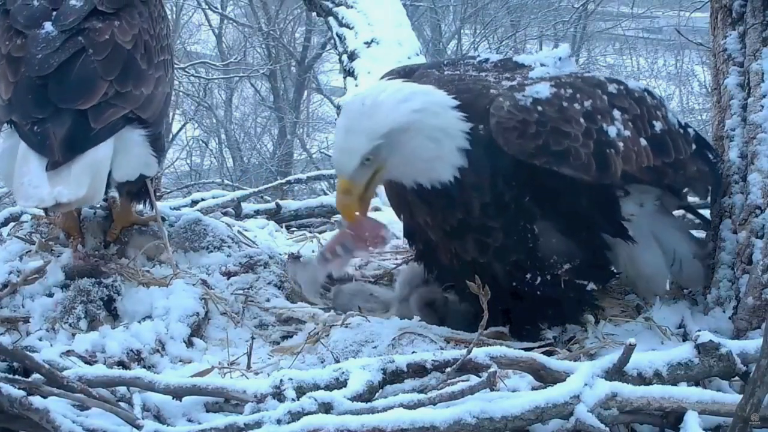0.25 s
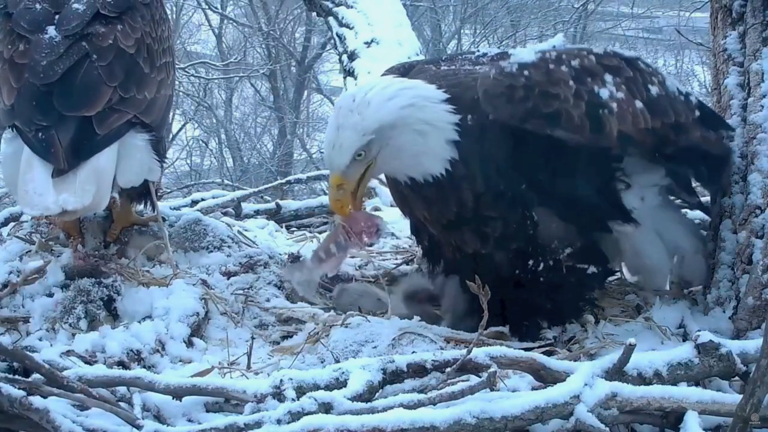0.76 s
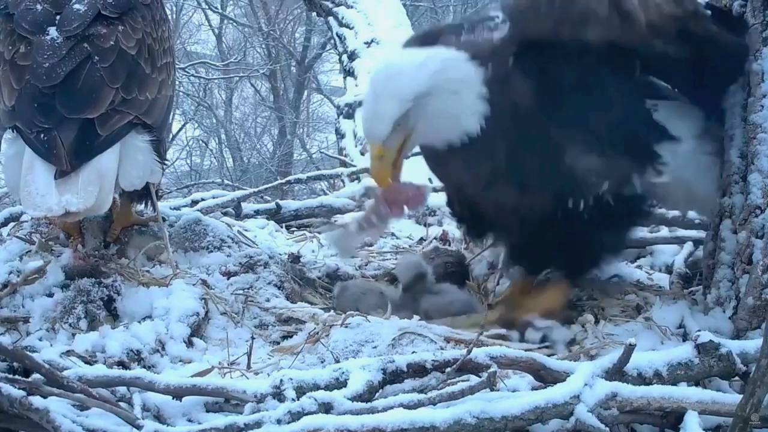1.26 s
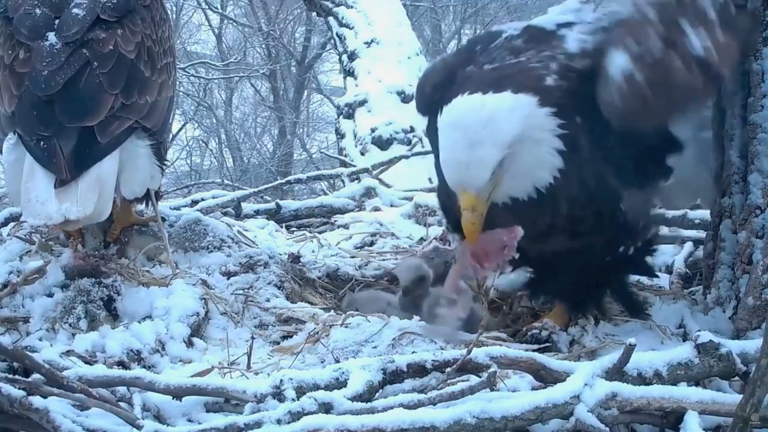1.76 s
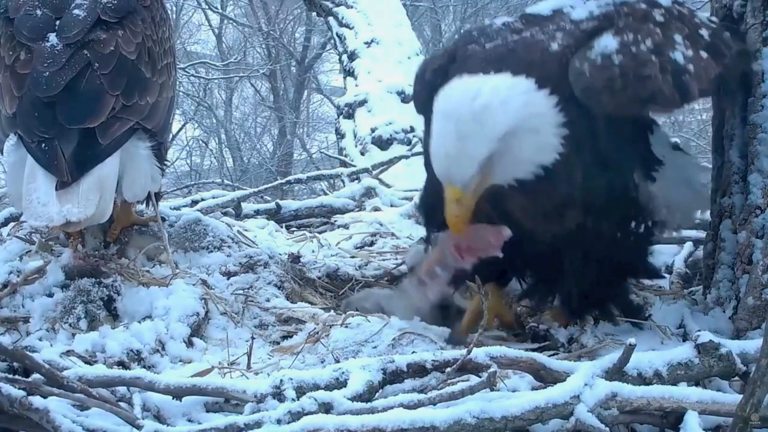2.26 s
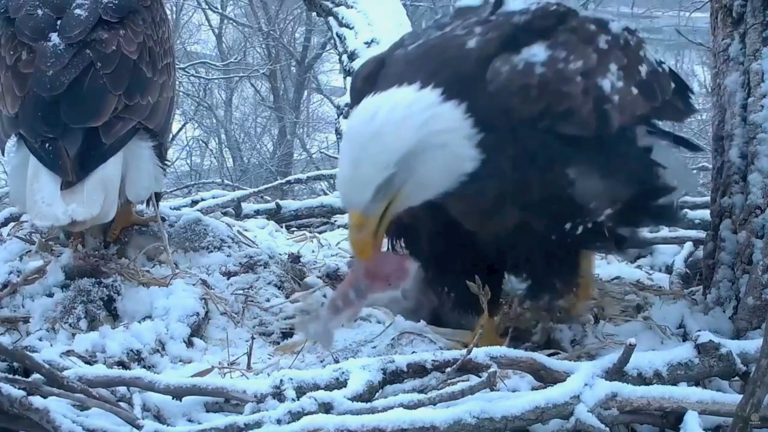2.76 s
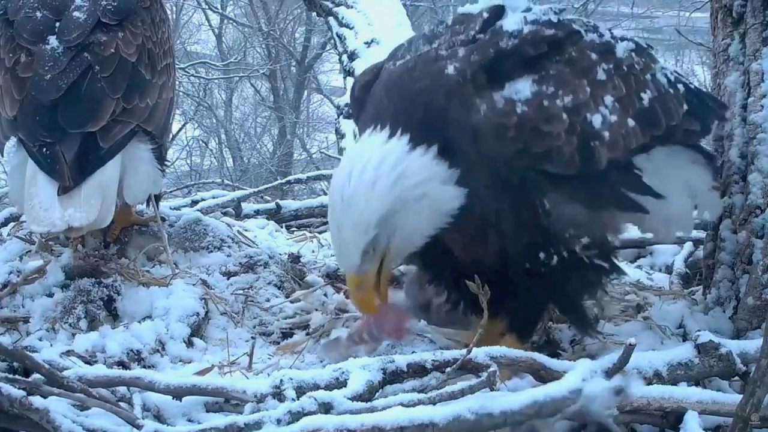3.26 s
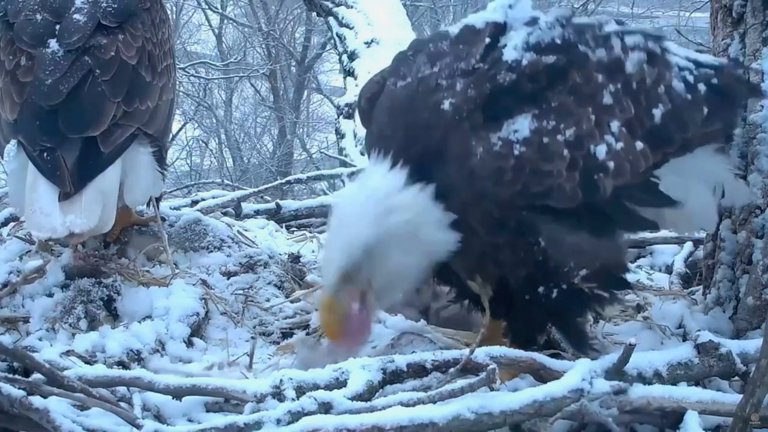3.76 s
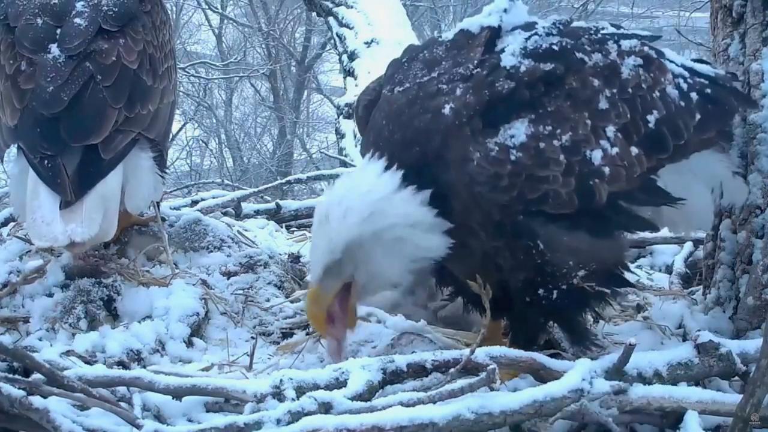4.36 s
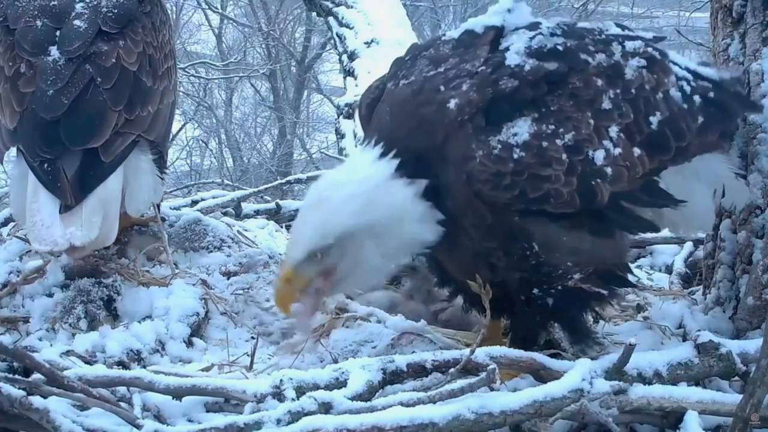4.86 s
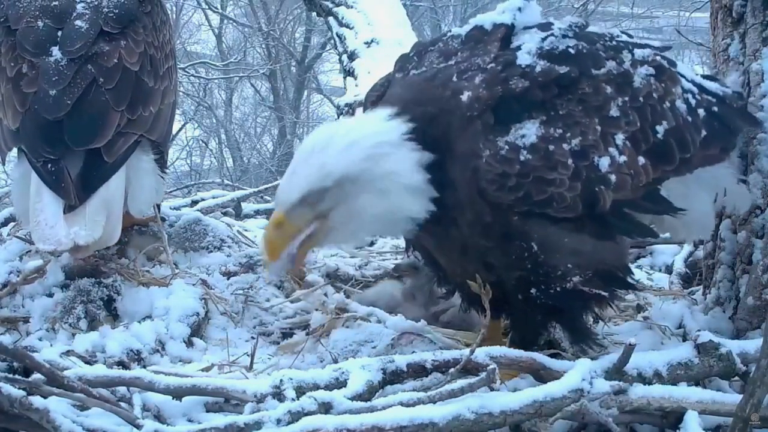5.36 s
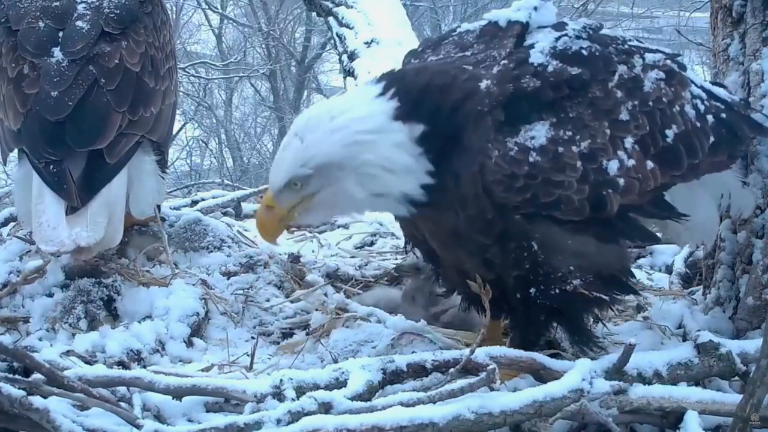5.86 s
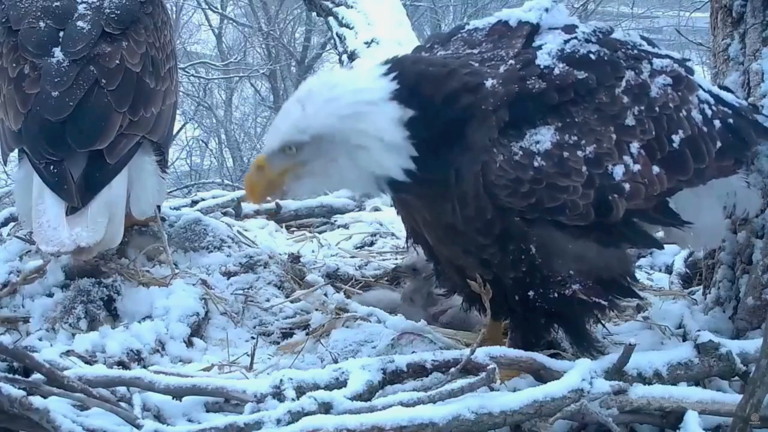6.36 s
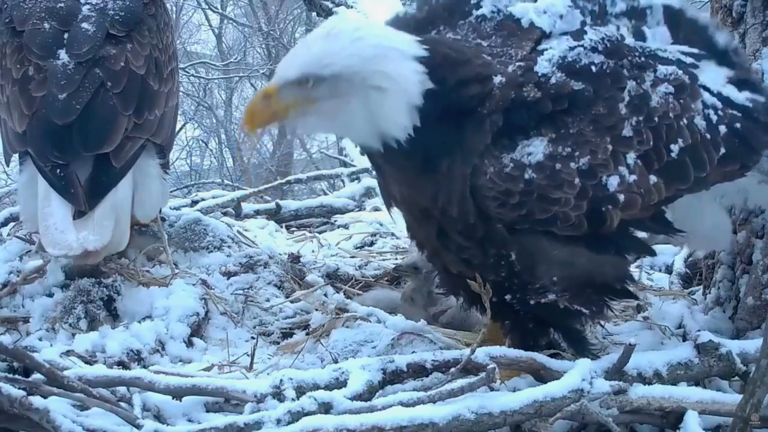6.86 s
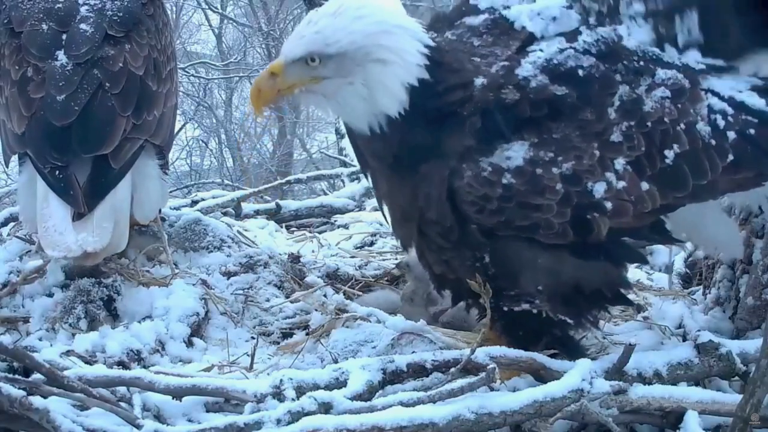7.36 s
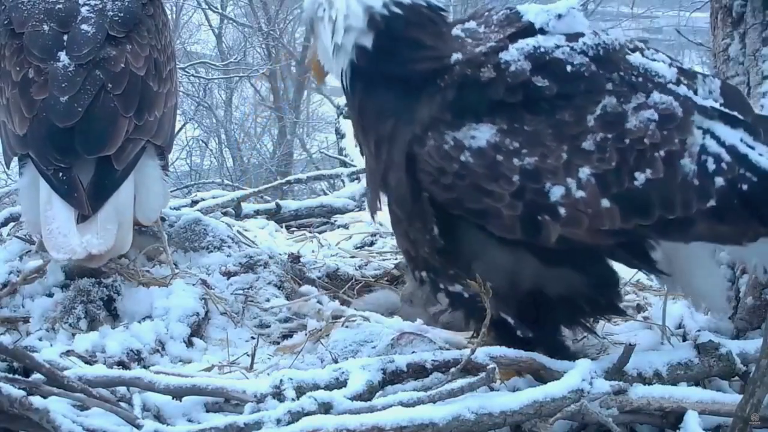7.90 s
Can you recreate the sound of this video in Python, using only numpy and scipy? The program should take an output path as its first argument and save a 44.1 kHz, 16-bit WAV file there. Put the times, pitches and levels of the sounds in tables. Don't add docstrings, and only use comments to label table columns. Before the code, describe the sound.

A close, low-quality outdoor microphone picks up hungry eaglets: tiny peeps, about seven piercing chirps in rapid succession, stuttering little notes between them, then irregular cheeps with growing gaps. Dry nest material rustles softly during the feeding. Later calls are quieter and sparser, ending with a small cluster of cheeps. A low windy hum with hiss stays underneath, and the calls have a bright, brittle digital edge and a brief woodland echo.

```python
import sys
import numpy as np
from scipy import signal
from scipy.fft import rfft, irfft, next_fast_len
from scipy.io import wavfile
from scipy.ndimage import uniform_filter1d

SR = 44100
rng = np.random.default_rng(int(sys.argv[2]) if len(sys.argv) > 2 else 0)


def master(y):
    cut = np.clip(np.atleast_2d(y).T, -1, 1)
    pcm = np.round(cut * 32767)
    wavfile.write(sys.argv[1], SR, pcm.astype(np.int16))


def field_ratio(decibels):
    return 10 ** (np.asarray(decibels, dtype=float) / 20)


N = 358533

# (time of peak [s], level [dB rms], pitch [Hz], rise [ms], fall [ms])
CHIRPS = [
    (0.7279, -27, 3140, 4.2, 2.9),
    (0.8203, -22.5, 3135, 4.5, 1.6),
    (0.9214, -22.5, 3085, 5.2, 1),
    (1.0276, -24.5, 3316, 4.8, 2.7),
    (1.1202, -23, 3535, 1.6, 2.97),
    (1.2228, -30, 3533, 4.5, 5),
    (1.3079, -40, 3476, 3.8, 3.1),
    (2.4154, -27, 3310, 3.9, 0.57),
    (7.811, -46, 3520, 1.9, 2.0),
    (7.955, -47.5, 3500, 2.3, 1.8),
]
CHIRP_TOP_HZ, SLIDE_SHARE = 3990, 0.556

# (time of peak [s], level [dB rms], pitch [Hz], glide [Hz/ms], length [ms])
CHEEPS = [(0.6463, -49, 3124, -13, 24), (2.615, -53, 2895, 17, 18), (2.757, -55, 3080, 29, 10),
          (1.2251, -33, 3346, -38, 3.7), (1.7596, -26, 2990, 18, 1.85), (1.9627, -33, 2930, -12, 3.1),
          (1.9852, -40, 3200, -16, 4.3), (2.02, -36.5, 3000, 13, 2.16), (2.2428, -26, 3130, -71, 1.57),
          (4.0299, -52.5, 3500, 13, 6.1), (4.5199, -34, 3140, 19, 2.13), (4.7286, -24, 3207, -66, 3.2),
          (4.729, -35.5, 3680, -32, 3.7), (4.734, -39, 2420, -3, 5.8), (4.752, -40, 3150, 5, 3.9),
          (6.1626, -36, 3040, -35, 3.1), (6.171, -41.5, 3015, -12, 4.6), (6.5013, -38, 3125, -3.5, 7),
          (7.5008, -37, 3150, 9, 4.6), (7.6671, -34, 3190, 38, 4.7), (7.814, -32.5, 3150, -28, 4.5),
          (7.815, -37.5, 2974, -17, 4), (7.958, -35.5, 3150, -4, 5.5), (7.9715, -40.5, 2865, -96, 3.8)]
CHEEP_RISE_SHARE = 0.47

BLIP_DELAY_MS, BLIP_DB, BLIP_HZ, BLIP_RISE_MS, BLIP_FALL_MS = 19, -25.5, 3200, 2.9, 4.3

# (time of peak [s], level [dB rms], pitch [Hz], length [ms])
STUTTERS = [(0.7891, -40, 3200, 7.1), (0.7984, -41.5, 3320, 11), (0.8044, -44, 3210, 7),
            (0.897, -38.5, 3590, 9), (0.9098, -37, 3230, 3.7), (0.9725, -46.5, 3150, 11),
            (1.002, -39.5, 3230, 5.1), (1.0098, -35.5, 3280, 6.7), (1.0964, -45.5, 3350, 15),
            (1.1995, -42, 3380, 4), (1.204, -36.5, 3240, 7), (1.213, -33.5, 3620, 8), (1.234, -50, 3430, 4),
            (1.888, -40.5, 3206, 8), (1.9, -52, 3160, 15.1), (1.982, -44.5, 3765, 7.5),
            (2.001, -53, 3400, 9.4), (2.042, -47, 3130, 19.7), (2.067, -43, 3050, 7.7),
            (2.095, -63, 3700, 8.7), (2.2639, -46, 3050, 7.6), (1.979, -53, 3850, 6),
            (0.945, -47, 3750, 19), (0.86, -52, 3700, 16), (1.06, -57, 3700, 16), (2.377, -50.5, 3090, 24),
            (2.4458, -51, 3560, 7.3)]
# (time of peak [s], level [dB
# rms], pitch [Hz], length [ms])
SOFT_PEEPS = [(0.023, -64, 2970, 14), (0.0334, -51.5, 3010, 4.2), (0.065, -63, 2870, 15),
              (0.0941, -54, 3000, 7.4), (0.1885, -52.5, 2980, 5.9), (0.2835, -51.5, 3040, 13),
              (0.3, -58, 3020, 8.3), (0.385, -56.5, 3070, 20), (0.494, -57, 2920, 2.8),
              (0.514, -53, 3500, 6.8), (0.5216, -48.5, 3500, 6.4), (0.604, -54, 2990, 7.3),
              (0.632, -51, 3200, 8), (3.02, -66, 3420, 14), (3.125, -61, 3550, 21),
              (2.8258, -60, 3103, 13.5), (2.8908, -56, 2890, 4.8), (3.3653, -62, 3190, 13),
              (3.385, -64, 3500, 16), (3.7596, -59, 2830, 10), (3.9184, -57.5, 2880, 2.8),
              (4.104, -65, 3290, 53), (4.516, -52, 3640, 4.3), (4.1348, -54.5, 3030, 4.3),
              (4.2741, -60, 3120, 5.3), (4.3362, -64.5, 3115, 18), (4.5568, -54, 3810, 6.3),
              (5.46, -46.5, 3020, 8.5), (5.477, -50, 3100, 8), (6.154, -44, 3064, 4.7),
           (6.18, -44.5, 3060, 7.8), (6.506, -52, 2842, 11), (6.52, -54, 3180, 8.7),
           (6.536, -58.5, 3780, 6.7), (6.87, -75, 3680, 36), (6.934, -62, 2940, 6.4),
           (7.051, -55, 3153, 25.5), (7.1235, -64.5, 3130, 8.6), (7.47, -62, 3200, 4.6),
           (7.598, -61, 3140, 7.9), (7.7184, -53, 3094, 14.4), (7.7584, -52, 3200, 5.7),
           (7.83, -49, 3450, 8.2), (7.998, -54, 3070, 7.6), (8.0625, -57, 3184, 9)]
# (time of peak [s], level [dB rms], pitch [Hz], length [ms])
SQUEAKS = [
    (0.747, -48.5, 1820, 24),
    (1.893, -45.5, 1874, 11.4),
    (1.92, -51, 1833, 20),
    (2.082, -51, 2495, 13),
    (2.125, -52.5, 2764, 12.4),
    (2.392, -62, 2450, 20),
    (2.776, -58, 2235, 27),
    (4.731, -43.5, 2132, 7),
    (5.2145, -56, 2485, 33),
    (7.842, -67, 2310, 33),
]
# (time of peak [s], level [dB rms], pitch [Hz], length [ms])
WHISTLES = [
    (2.041, -65, 4900, 30),
    (2.824, -55, 4910, 43),
    (2.886, -59, 5300, 34),
    (3.011, -68, 4640, 29),
    (3.141, -62, 4690, 19),
    (4.601, -58, 4650, 26),
]
SOFT_RISE_SHARE, SAG_HZ = 0.31, 46

BRANCH_T60_S, BRANCH_DB, ECHO_S, ECHO_DB = 0.088, -9.5, 0.029, -29
WOODS_T60_S, WOODS_DB = 0.28, -15

# (time [s], level [dB])
RUSTLE = [(0.0, -58), (0.34, -93), (0.74, -63), (0.86, -54), (1.03, -65.5), (1.15, -53.5), (1.29, -59.5),
          (1.7, -81), (1.81, -56), (1.97, -49), (2.56, -59), (3.28, -65), (3.71, -75.5), (5.18, -84.5),
          (5.41, -64), (5.91, -77.5), (7.4, -71.5), (8.13, -63)]
# (time [s], level [dB])
HUM = [(0.0, -56), (0.52, -57), (0.72, -56), (0.9, -55), (1.25, -54.5), (1.72, -57.5), (2.06, -54),
       (2.76, -57.5), (3.01, -56), (3.78, -61.5), (4.71, -58.5), (5.48, -58), (5.84, -61), (6.97, -59.5),
       (7.36, -61.5), (7.83, -57), (8.13, -56)]
# (frequency [Hz], level [dB])
MAINS = [(120, -92), (180, -75), (300, -71)]
# (frequency [Hz], density [dB per Hz])
HISS = [(20, -4), (70, 8), (100, -10), (300, -10.5), (5000, -17), (6000, -3.5), (8000, -7.5), (11000, -9.5),
        (14300, -16), (14700, -17), (15200, -16)]
HISS_DB = -25.5

# (centre [Hz], width [Hz], level [dB])
HOUSING = [(146, 43.2, -15), (276.2, 21.6, -5.5), (388.6, 24.3, -13.5), (418, 94, -21.5),
           (667.8, 16.7, -12.5), (751, 54.4, -20), (910, 54, -25), (1115, 23.5, -21.5), (1281.4, 86, -14.5),
           (1377, 57, -7), (1440, 64.6, -7.5), (1582, 39.7, 1), (1728, 25.7, -5), (1867, 46, -8),
           (1975, 65, -15), (2032, 75, -12), (2428, 97, -18), (2453.6, 60, -13.5), (2630, 31, -23),
           (2772, 142, -19.5), (3150, 124, -14.5), (3500, 270, -19.5), (3700, 20, -16), (3716, 160, -28.5),
           (3980, 240, -31.5), (4527, 190, -33), (4664, 212, -17.5), (4980, 97, -16.5), (5223, 65, -18.5),
           (5520, 145, -25.5)]
RING_UP_MS = 1.5
SAMPLING_HZ = 8000
# (time [s], level [dB])
MIRROR = [
    (0, 2.5),
    (1.5, -0.9),
    (3.6, -0.5),
    (6.47, -1.1),
    (6.497, -19),
    (6.56, -3.5),
    (7.7, -0.5),
    (7.85, -3),
    (8.13, 0),
]
# (low edge [Hz], high edge [Hz], level [dB])
LOBES = [(10740, 11350, -27.5), (12080, 13100, -30)]
OVERDRIVE = 0.83


def loud_calls():
    calls = [(s, db, hz, -SLIDE_SHARE * (CHIRP_TOP_HZ - hz) / rise, rise, fall)
             for s, db, hz, rise, fall in CHIRPS]
    calls += [(s, db, hz, glide, CHEEP_RISE_SHARE * ms, (1 - CHEEP_RISE_SHARE) * ms)
              for s, db, hz, glide, ms in CHEEPS]
    blips = [(s + BLIP_DELAY_MS / 1000, db + BLIP_DB, BLIP_HZ, 0, BLIP_RISE_MS, BLIP_FALL_MS)
               for s, db, *_ in calls]
    return calls + blips


def soft_calls(rows, sag_hz):
    return [(s, db, hz, -sag_hz / ms, SOFT_RISE_SHARE * ms, (1 - SOFT_RISE_SHARE) * ms)
            for s, db, hz, ms in rows]


def voices(calls, waver_hz=25, rasp=0.36):
    out = np.zeros(N)
    flutter = 0.6 * drift(200) + 0.8 * drift(700)
    waver = drift(150)
    for s, db, hz, glide, rise, fall in calls:
        ms = np.arange(-2 * rise, 4 * fall, 1000 / SR)
        swell = np.exp(-1.15 * (ms / rise) ** 2)
        decay = np.exp(-1.3 * (np.abs(ms) / fall) ** 1.78)
        shape = np.where(ms < 0, swell, decay)
        bent_ms = np.where(ms < 0, ms * (1 - 0.25 * ms / rise), np.minimum(ms, fall * 1.6))
        pitch = hz + np.clip(glide * bent_ms, -1200, max(3950 - hz, 0))
        at = round((s - (2 * rise + RING_UP_MS) / 1000) * SR) + np.arange(len(ms))
        pitch = pitch + waver_hz * waver[np.minimum(at, N - 1)]
        level = field_ratio(db + 1.5) / housing_gain(hz - 150, hz + 150)
        tone = level * shape * np.sin(2 * np.pi * np.cumsum(pitch) / SR)
        hoarse = rasp if db < -36 and rise + fall < 23 else 0.17
        inside = at < N
        out[at[inside]] += tone[inside] * (1 + hoarse * flutter[at[inside]])
    return out


def branches(calls):
    t = np.arange(SR // 2) / SR
    near = rng.standard_normal(len(t)) * field_ratio(-60 * t / BRANCH_T60_S) * np.minimum(t / 0.01, 1)
    spectrum = rfft(near)
    smooth_power = uniform_filter1d(abs(spectrum) ** 2, size=60)
    near = irfft(spectrum / np.sqrt(smooth_power), len(t))
    near *= field_ratio(BRANCH_DB) / np.sqrt(np.sum(near ** 2))
    far = rng.standard_normal(len(t)) * field_ratio(-60 * t / WOODS_T60_S) * np.minimum(t / 0.013, 1)
    scatter = near + far * field_ratio(WOODS_DB) / np.sqrt(np.sum(far ** 2))
    scatter[round(ECHO_S * SR)] += field_ratio(ECHO_DB)
    answer = signal.fftconvolve(calls, scatter)[:N]
    shimmer = np.exp(1.2j * drift(110))
    return np.real(shimmer * signal.hilbert(answer, next_fast_len(N))[:N])


def rustle():
    grain = field_ratio(3.5 * drift(17) + 0.68 * drift(110))
    noise = rms_one(grain * band(rng.standard_normal(N), 2410, 3730, order=6))
    return field_ratio(in_time(RUSTLE) - 6.5) * noise / housing_gain(3400, 3470)


def wind_hum():
    noise = rms_one(band(rng.standard_normal(N), 42, 2770))
    gusts_db = 0.59 + 1.46 * drift(5.8)
    return field_ratio(in_time(HUM) + gusts_db) * noise / housing_gain(76, 2600)


def electronics():
    hz = np.fft.rfftfreq(N, 1 / SR)
    points_hz, points_db = np.transpose(HISS)
    colour = field_ratio(np.interp(np.log(hz + 1), np.log(points_hz), points_db))
    hiss = rms_one(irfft(rfft(rng.standard_normal(N)) * colour, N))
    t = np.arange(N) / SR
    mains = sum(field_ratio(db + 1.5 * drift(7.7)) * np.sin(2 * np.pi * line_hz * t) for line_hz, db in MAINS)
    return field_ratio(in_time(HUM) + HISS_DB) * hiss + mains


def housing(hz):
    hz = np.maximum(hz, 1)
    return sum((-1) ** k * field_ratio(db) / (1 + 1j * (hz - centre ** 2 / hz) / width)
               for k, (centre, width, db) in enumerate(HOUSING))


def housing_gain(low_hz, high_hz):
    return np.sqrt(np.mean(abs(housing(np.linspace(low_hz, high_hz, 60))) ** 2))


def through_housing(x):
    size = next_fast_len(N + SR // 2)
    return irfft(rfft(x, size) * housing(np.fft.rfftfreq(size, 1 / SR)), size)[:N]


def rms_one(x):
    return x / np.sqrt(np.mean(x ** 2) + 1e-20)


def in_time(rows):
    s, value = np.transpose(rows)
    return np.interp(np.arange(N) / SR, s, value)


def band(x, low_hz, high_hz, order=4):
    return signal.sosfilt(signal.butter(order, [low_hz, high_hz], "band", fs=SR, output="sos"), x)


def drift(rate_hz):
    r = np.exp(-2 * np.pi * rate_hz / SR)
    wander = signal.lfilter([1], [1, -2 * r, r * r], rng.standard_normal(N + SR))
    return rms_one(wander[SR:])


def scene():
    calls = voices(loud_calls() + soft_calls(SOFT_PEEPS, SAG_HZ) + soft_calls(SQUEAKS, sag_hz=30.2))
    calls += voices(soft_calls(STUTTERS, SAG_HZ), waver_hz=110, rasp=0.5)
    return (calls + branches(calls) + rustle() + wind_hum())[None]


def band_limit(x):
    return signal.sosfilt(signal.butter(12, 15050, fs=SR, output="sos"), x)


def record(dry):
    turn = 2 * np.pi * SAMPLING_HZ * np.arange(N) / SR
    mirrored = dry[0] * (1 + 2 * field_ratio(in_time(MIRROR)) * np.cos(turn))
    mirrored += voices(soft_calls(WHISTLES, sag_hz=0))
    playback_filter = signal.butter(10, 5750, fs=SR, output="sos")
    passed = signal.sosfilt(playback_filter, through_housing(mirrored))
    higher = band(passed, 2000, 3900) * 2 * (np.cos(turn) + np.cos(2 * turn))
    swing = np.sqrt(uniform_filter1d(passed ** 2, size=1800, origin=700) + 1e-12)
    higher = higher * (swing / 0.015) ** OVERDRIVE
    leaked = sum(field_ratio(db) * band(higher, low_hz, high_hz, order=3) for low_hz, high_hz, db in LOBES)
    return band_limit((passed + leaked + electronics())[None])


dry = scene()
out = record(dry)
master(out)
```